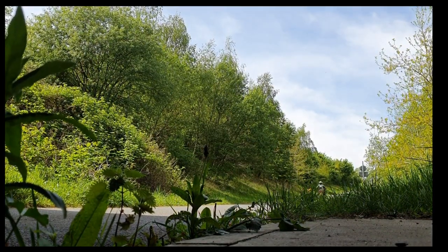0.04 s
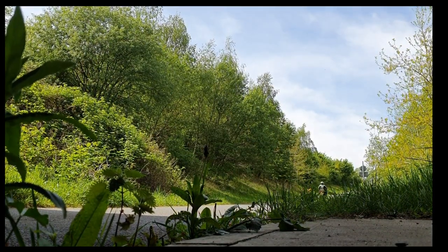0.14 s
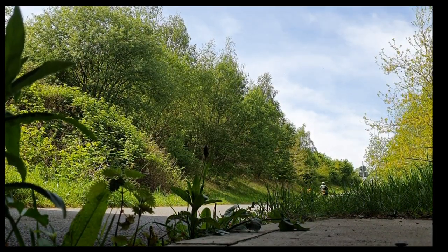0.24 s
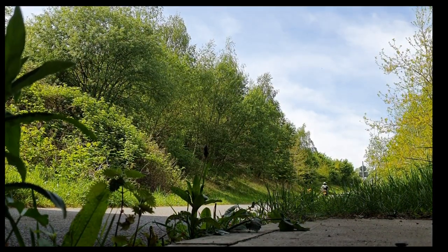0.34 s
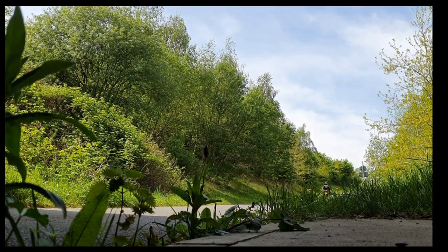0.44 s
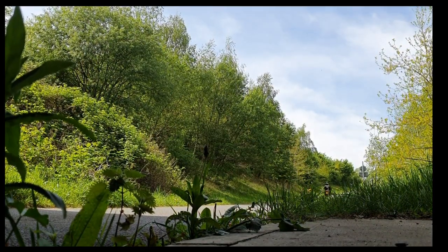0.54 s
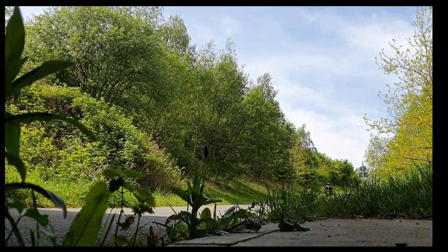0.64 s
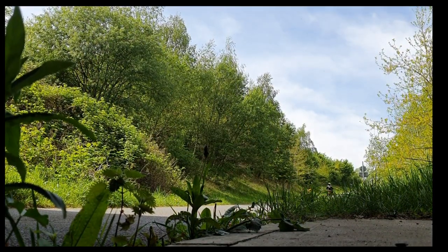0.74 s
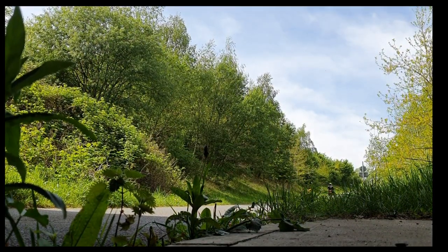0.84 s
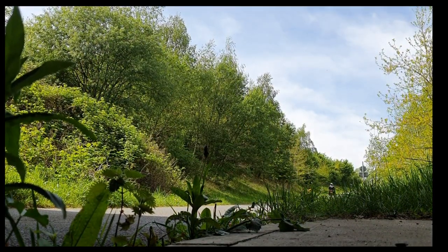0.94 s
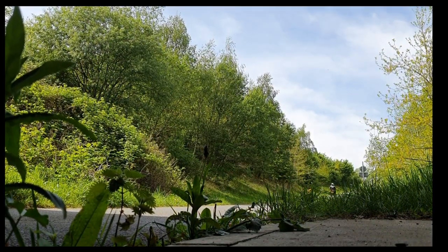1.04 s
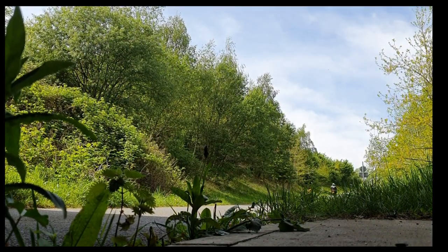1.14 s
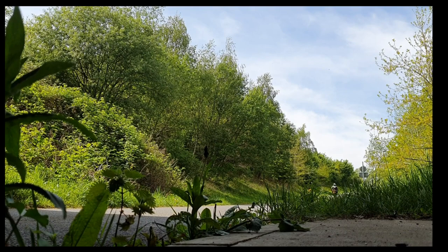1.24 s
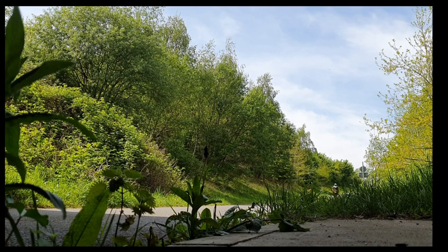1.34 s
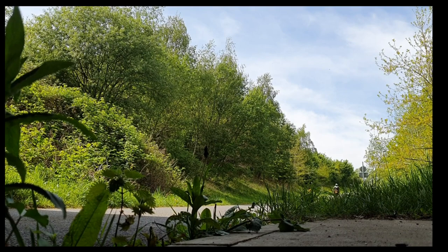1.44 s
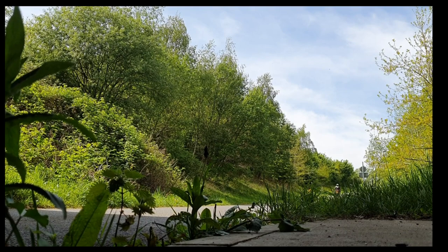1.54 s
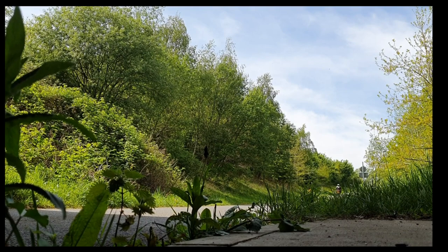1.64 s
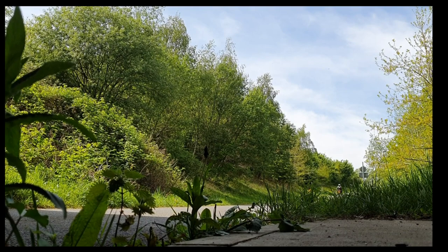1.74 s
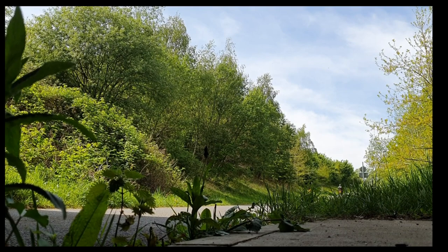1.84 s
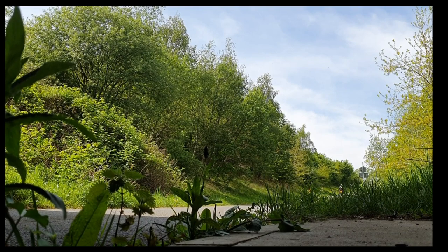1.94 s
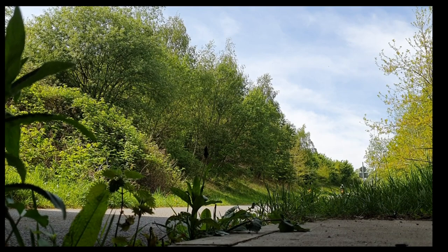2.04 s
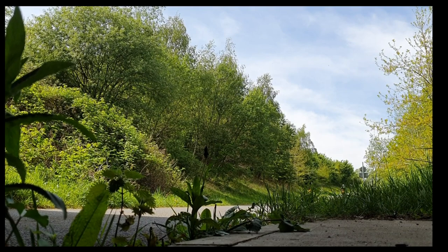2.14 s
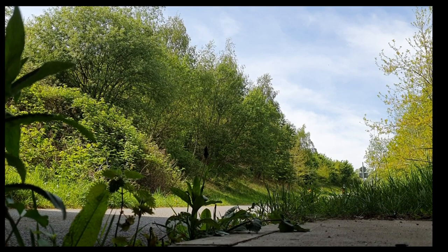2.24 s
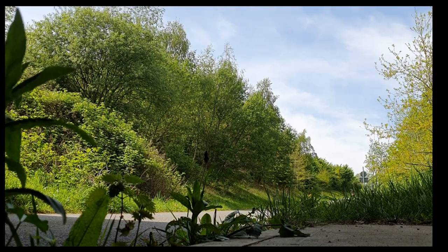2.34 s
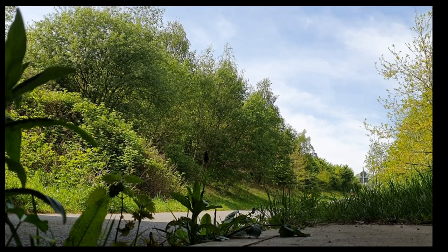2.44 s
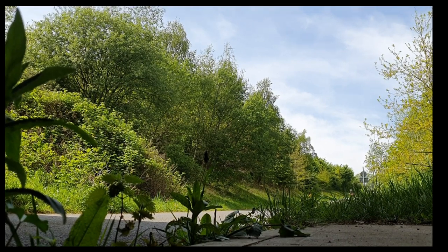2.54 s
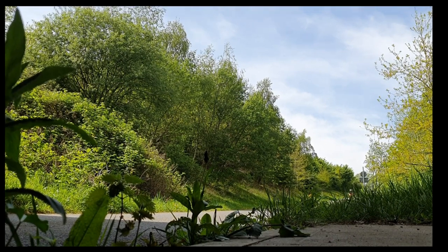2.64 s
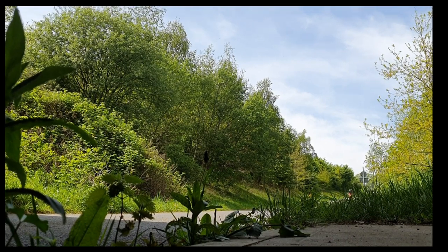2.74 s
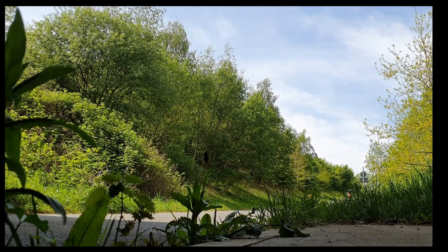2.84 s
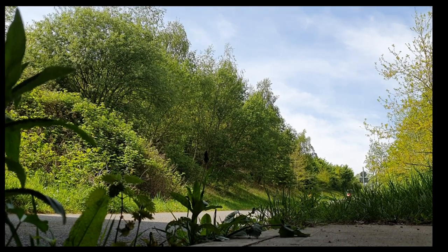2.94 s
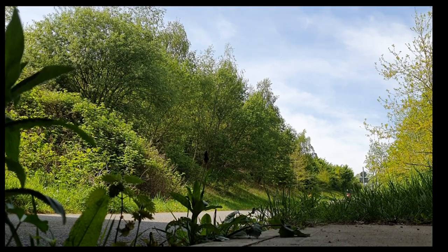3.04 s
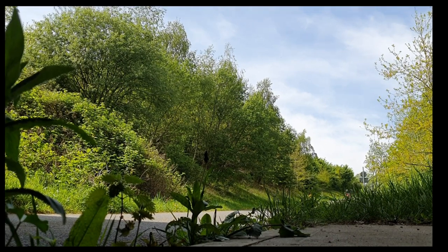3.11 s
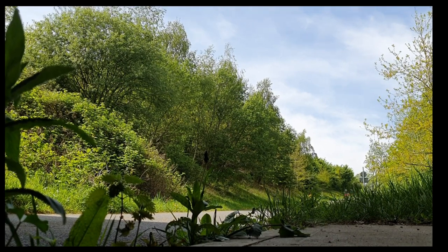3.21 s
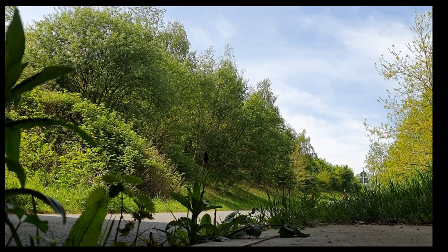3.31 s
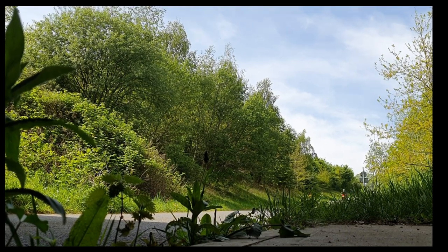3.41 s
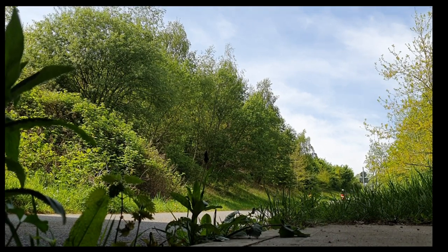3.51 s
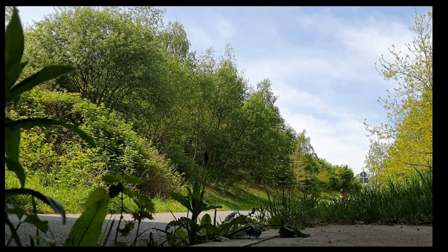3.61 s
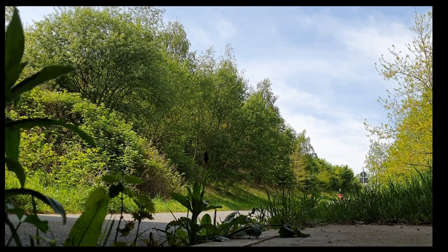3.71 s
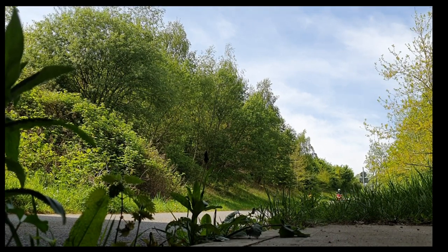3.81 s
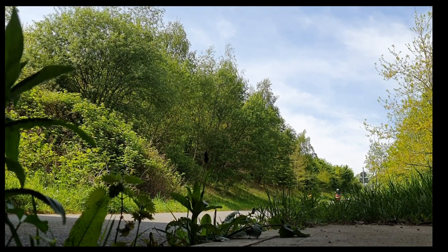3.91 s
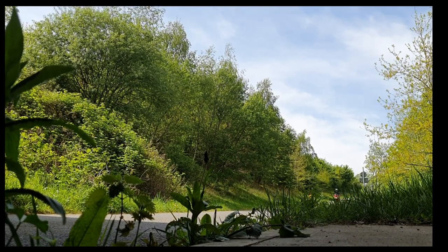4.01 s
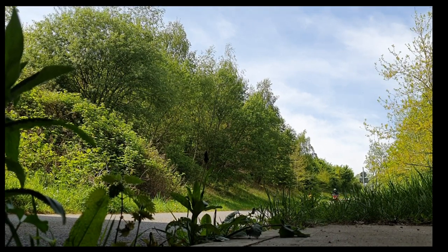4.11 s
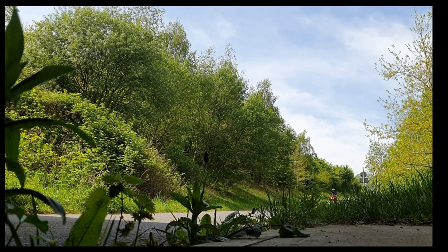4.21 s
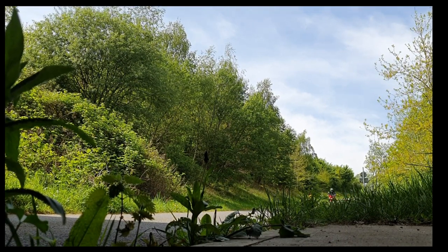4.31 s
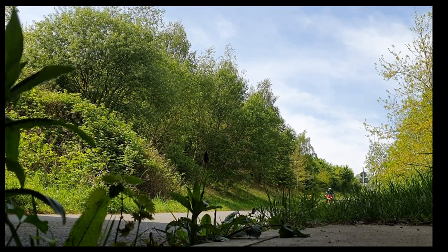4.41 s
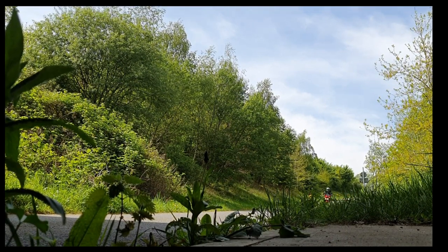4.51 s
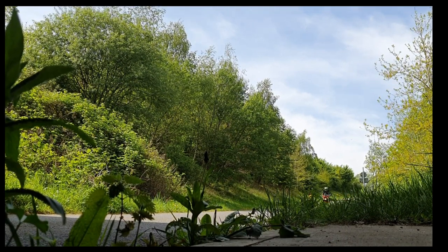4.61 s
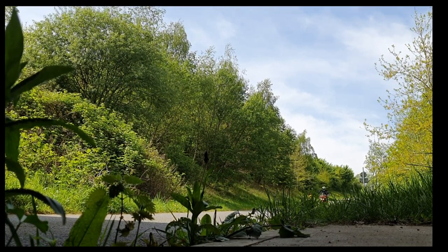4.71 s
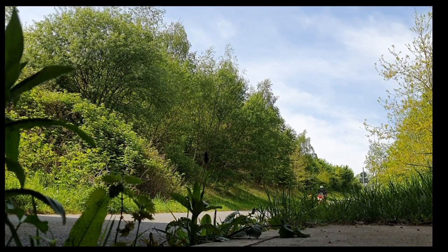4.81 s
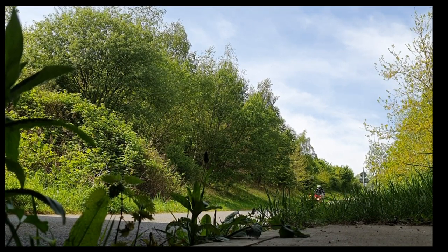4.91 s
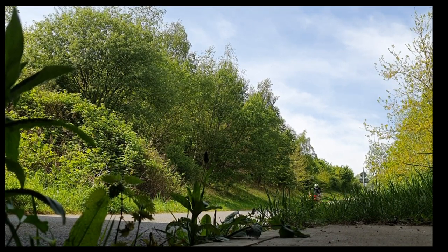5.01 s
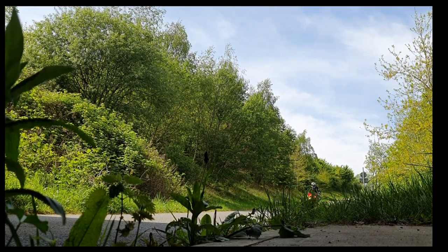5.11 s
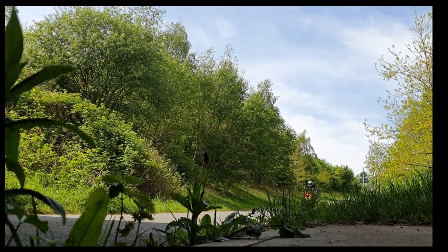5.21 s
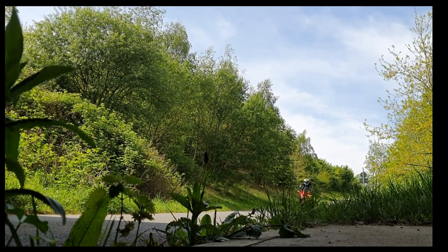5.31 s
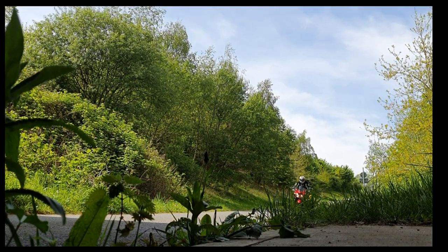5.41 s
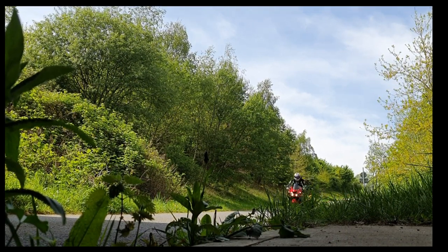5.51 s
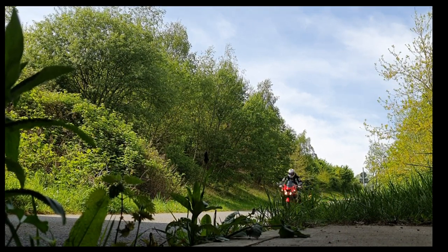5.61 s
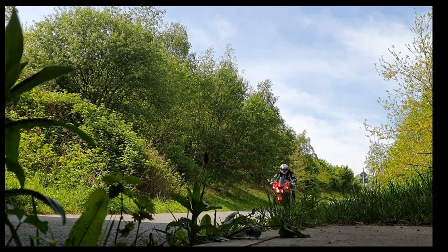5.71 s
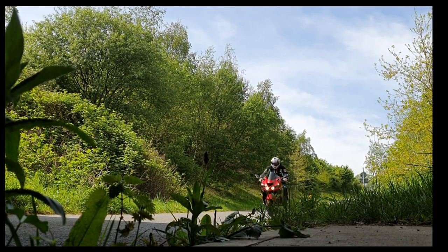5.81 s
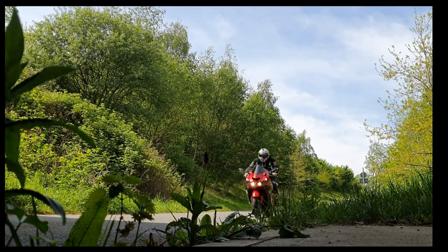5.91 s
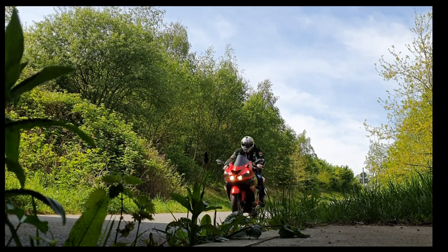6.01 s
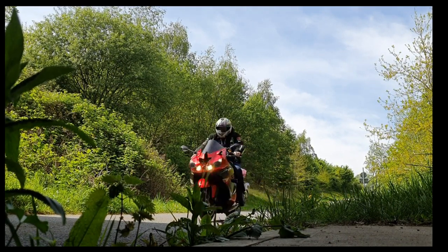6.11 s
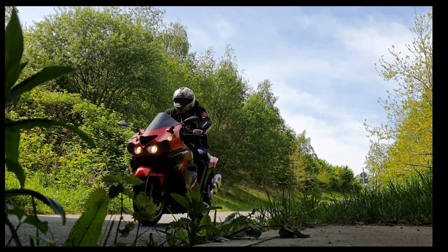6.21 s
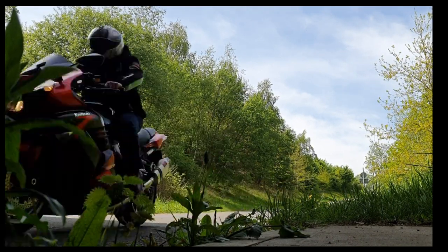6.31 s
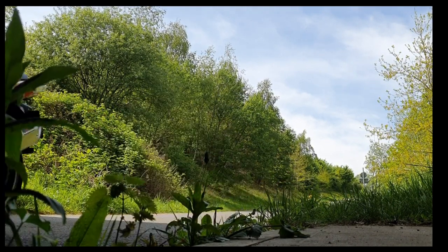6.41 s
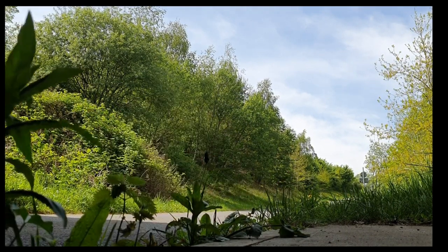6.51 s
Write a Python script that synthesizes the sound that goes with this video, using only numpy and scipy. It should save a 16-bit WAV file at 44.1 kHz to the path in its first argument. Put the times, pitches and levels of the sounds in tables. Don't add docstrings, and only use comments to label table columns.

```python
import sys
import numpy as np
from scipy import signal
from scipy.io import wavfile
from scipy.ndimage import uniform_filter1d

SR = 44100
rng = np.random.default_rng(int(sys.argv[2]) if len(sys.argv) > 2 else 0)


def store_pcm(level_fs):
    pcm = np.round(np.clip(level_fs, -1, 1) * 32767).astype(np.int16)
    wavfile.write(sys.argv[1], SR, np.atleast_2d(pcm).T)


def volts_from_decibels(level):
    exponent = np.asarray(level, float) / 20
    return 10 ** exponent


N = 288836
T = np.arange(N) / SR
CUT_S, ABEAM_S = 2.2695, 6.4
# (time [s], level [dB])
DRONE_FADE = [(0, -26), (.4, -24), (1.05, -31), (1.65, -42), (2.25, -34)]


def evened(x):
    return x / np.sqrt(np.mean(abs(x) ** 2) + 1e-20)


def read(points, hz):
    f, value = np.transpose(points)
    return np.interp(np.log(hz + 1), np.log(f + 1), value)


def columns(rows, t):
    s, *values = np.transpose(rows)
    return [np.interp(t, s, v) for v in values]


def drift(rate_hz):
    size = max(int(SR / 64 / rate_hz), 1)
    slow = uniform_filter1d(uniform_filter1d(rng.standard_normal(N // 64 + 2), size), size)
    return np.interp(np.arange(N), np.arange(len(slow)) * 64, evened(slow))


def noise(far, near, band_hz, lag_samples):
    # (frequency [Hz], correlation [0-1])
    likeness = [(30, .99), (300, .97), (600, .85), (1200, .6), (2000, .4), (4000, .35), (9000, .25),
                (16000, .3)]
    # (frequency [Hz], level [dB])
    lean_db = [(60, -1), (500, -1.6), (4000, -2.3), (9000, 2), (15000, 2.8)]
    patchy_db = 1.2
    frames, hz = N // 256 + 5, np.fft.rfftfreq(1024, 1 / SR)
    a, b, c, d, patches = rng.standard_normal((frames, 513, 5)).T
    patches = evened(uniform_filter1d(uniform_filter1d(patches, 8, 0), 12, 1))
    frame_s = np.arange(frames) * 256 / SR
    closeness = np.interp(frame_s, [CUT_S, 2.3, 3.3, 5, 6, 6.35], [0, .25, .05, .5, .8, 1])
    shape = volts_from_decibels(np.outer(read(far, hz), 1 - closeness) + np.outer(read(near, hz), closeness))
    inside = (hz >= band_hz[0]) & (hz <= band_hz[1])
    shape /= np.sqrt((shape[inside] ** 2).sum(0))
    same = np.clip(read(likeness, hz), 0, 1)[:, None]
    right = a + 1j * b
    left = same * right + np.sqrt(1 - same ** 2) * (c + 1j * d)
    late = np.exp(-2j * np.pi * hz * lag_samples / SR)[:, None]
    lean = volts_from_decibels(read(lean_db, hz) / 2)[:, None]
    z = np.array([lean * late * left, right / lean]) * shape * volts_from_decibels(patchy_db * patches)
    return np.sqrt(1.5) * signal.istft(z, nperseg=1024, noverlap=768)[1][:, :N]


def birds():
    # (start [s], from [Hz], to [Hz], level [dB])
    chirps = [(.055, 3950, 3850, -63), (.33, 5600, 4900, -65), (.655, 5400, 3800, -61),
              (.942, 5700, 4380, -62), (1.245, 5800, 4950, -60), (1.625, 4100, 3720, -63),
              (1.905, 4500, 4450, -61), (2.235, 5900, 5000, -61)]
    # (start [s], length [s], from [Hz], to [Hz], level [dB])
    song = [(2.29, .09, 4670, 4520, -51), (2.374, .03, 4570, 4200, -50), (2.665, .045, 7670, 5930, -46),
            (2.669, .012, 5530, 7000, -56), (2.736, .011, 4040, 5670, -52), (2.742, .03, 5680, 4750, -50),
            (2.835, .022, 4350, 3000, -44), (2.859, .018, 3100, 2350, -52), (2.88, .05, 2510, 3620, -42.5),
            (2.971, .075, 6310, 3665, -42.5), (3.038, 0.089, 3580, 4190, -43),
            (3.17, .065, 3900, 2340, -50), (3.233, .05, 2290, 2890, -52), (3.303, 0.039, 2750, 2610, -54),
            (3.446, .055, 3730, 2390, -50.5), (3.505, .045, 3400, 3810, -50.5),
            (3.58, 0.06, 2880, 3210, -48), (3.631, 0.03, 3110, 2320, -52.5),
            (3.666, 0.056, 2330, 2530, -54)]
    chirp_s, chirp_glide, song_glide = .05, 5.5, 2.7
    swell_at, swell_db = .55, -16
    dry, waver = np.zeros((2, N)), .6 * drift(200)
    notes = [(s, chirp_s, a, b, db, chirp_glide) for s, a, b, db in chirps]
    notes += [(*row, song_glide) for row in song]
    for s, length_s, from_hz, to_hz, top_db, glide in notes:
        span = slice(round(s * SR), round((s + length_s) * SR))
        u = (T[span] - s) / length_s
        hz = to_hz + (from_hz - to_hz) * np.exp(-glide * u)
        level = volts_from_decibels(top_db + swell_db * (u - swell_at) ** 2)
        whistle = np.sin(2 * np.pi * np.cumsum(hz) / SR + waver[span])
        note = np.sqrt(2) * level * whistle * signal.windows.tukey(len(hz), .12)
        dry[:, span] += note * volts_from_decibels(np.array([[.5], [2.5]]))
    dry *= volts_from_decibels(3.2 * drift(130))
    dry[0] = np.roll(dry[0], 2)
    t = T[:SR // 2]
    trees = rng.standard_normal((2, len(t))) * volts_from_decibels(-60 * t / .55) * np.clip(t / .01, 0, 1)
    trees /= np.linalg.norm(trees[0])
    ground = volts_from_decibels(-10) * np.roll(dry[::-1], 400, axis=1)
    return dry + ground + volts_from_decibels(-7) * signal.fftconvolve(dry, trees, axes=1)[:, :N]


def drone():
    note_db = columns(DRONE_FADE, T)[0]
    octave_db = -33 + 1.6 * (note_db + 22)
    angle = 2 * np.pi * 63.55 * T + .3 * drift(8)
    hum = volts_from_decibels(note_db + 0.4 * drift(7.6)) * np.sin(angle) + volts_from_decibels(octave_db) * np.sin(2 * angle)
    hum = np.sqrt(2) * hum * np.clip((CUT_S - T) / .004, 0, 1)
    return np.array([volts_from_decibels(2.8) * np.roll(hum, 20), hum])


def wind():
    # (frequency [Hz], level [dB/Hz])
    gust = [(20, -12.5), (32, -6.5), (45, 17), (70, 1), (110, -5.5), (200, -5), (400, -23), (900, -58)]
    lull_s, blast_s, blast_rise_s = 0.96, 6.33, 0.022
    early_db = -32.5 + .75 * (columns(DRONE_FADE, T)[0] + 24)
    late_db = -55.5 + 13.5 * np.exp(-(T - CUT_S) / lull_s)
    late_db += 25 / (1 + np.exp(-(T - blast_s) / blast_rise_s))
    level = volts_from_decibels(np.where(T < CUT_S, early_db, late_db))
    return level * volts_from_decibels(2 * drift(14)) * noise(gust, gust, (25, 55), 0)


def blast():
    # (time [s], thump [dB], length [s], choked share of engine tone [0-1])
    pops = [
        (3.48, -30, .08, 0),
        (6.368, -18, .007, .75),
        (6.385, -21, .012, 0),
        (6.455, -15, .011, .9),
        (6.51, -22, .015, .1),
    ]
    raw = signal.lfilter(*signal.butter(1, [50, 240], "band", fs=SR), rng.standard_normal(N))
    raw = evened(signal.lfilter(*signal.butter(2, 700, fs=SR), raw))
    thumps, gain = np.zeros(N), np.ones(N)
    for s, thump_db, length_s, choke in pops:
        bump = np.exp(-((T - s) / length_s) ** 2)
        thumps += volts_from_decibels(thump_db) * bump * raw
        gain -= choke * bump
    return thumps, gain


def chain():
    # (frequency [Hz], level [dB/Hz])
    rub = [(1530, -38), (2600, -8.5), (3060, -10.5), (3610, 3), (4220, -4), (5100, -13), (7500, -18),
           (9750, -46), (16500, -120)]
    level_db = -34 - 8.7 * ((T - ABEAM_S + .03) / .23) ** 2
    return volts_from_decibels(level_db) * noise(rub, rub, (3200, 6500), 6)


def treble(near):
    # (frequency [Hz], level [dB/Hz])
    far_treble = [(4410, -31), (7500, -0.5), (9470, -2), (12000, -20.5), (13000, -16.5), (15600, -31)]
    # (frequency [Hz], level [dB/Hz])
    near_treble = [(4410, -32), (7500, -7.5), (8640, -2), (11200, -2), (15100, -10.5), (15600, -8)]
    level_db = -82.5 + 23 * np.tanh(near / 0.44)
    level_db += 36.5 * np.maximum(T - 6.013, 0)
    return volts_from_decibels(level_db) * noise(far_treble, near_treble, (8000, 15000), 6)


def hiss(turns, near):
    # (frequency [Hz], level [dB/Hz])
    far_hiss = [(760, -27), (1300, -1), (1810, -1), (2110, -4), (2760, -5.5), (3040, -1.5), (3430, -7),
                (3940, -4), (5110, -12.5), (6890, -22), (9000, -37), (11700, -53.5), (19800, -120)]
    # (frequency [Hz], level [dB/Hz])
    near_hiss = [(760, -33.5), (1300, -4), (1920, -0.5), (2290, -3.5), (2780, -5), (3250, -12), (3750, -5),
                 (4380, -9.5), (5400, -22.5), (9000, -25), (11700, -54.5), (19800, -120)]
    puff = 1 + .15 * np.cos(2 * np.pi * turns)
    return volts_from_decibels(-56 + 19.5 * near) * puff * noise(far_hiss, near_hiss, (1400, 2200), 6)


def roar(hz, turns, near, past):
    # (frequency [Hz], level [dB/Hz])
    far_roar = [(40, -4.5), (70, 9.5), (130, 25.5), (250, 14), (450, 12.5), (700, 3), (1200, -3),
                (2000, -53), (6000, -65.5)]
    # (frequency [Hz], level [dB/Hz])
    near_roar = [(40, -27), (70, -12.5), (130, 8), (220, 8.5), (450, 5), (700, 7), (1200, 2.5),
                 (2000, -51.5), (6000, -68)]
    eased = np.clip((T - 2.945) / 0.37, 0, 1)
    pull_db = -49.5 + 7.5 * np.log2(np.maximum(hz / 98, 1))
    off_db = -48.5 + 15 * near - 4.5 * past
    level_db = (1 - eased) * pull_db + eased * off_db
    puff = 1 + .3 * np.cos(2 * np.pi * turns)
    return volts_from_decibels(level_db) * puff * noise(far_roar, near_roar, (650, 1300), 12)


def motion():
    # (time [s], firing rate [Hz])
    speed = [(0, 87.2), (.52, 91.6), (.83, 95), (1.34, 102.1), (1.96, 110.6), (2.268, 113.3),
             (2.271, 127.7), (2.9, 161.8), (3.21, 175.6), (3.31, 178.7), (3.42, 172.2), (3.52, 169.9),
             (3.65, 173), (4.04, 167.8), (5.09, 156), (6.13, 142.1), (6.34, 138.4), (6.55, 131.6)]
    # (time [s], nearness [0-1])
    approach = [(3.4, 0), (4, 0.1), (4.5, 0.16), (5, .38), (5.5, 0.55), (5.75, 0.76), (6, 0.76),
                (6.2, 0.97)]
    return columns(speed, T)[0], columns(approach, T)[0], np.clip((T - 6.38) / 0.11, 0, 1)


def orders(hz, near, past):
    # (time [s], level [dB])
    pull_first = [(0, -25), (.21, -24.6), (.45, -17.5), (.93, -15.2), (1.34, -17.8), (1.55, -27),
                  (1.68, -24.5), (1.86, -32), (2.1, -20), (2.28, -18), (2.37, -28.5), (2.58, -28),
                  (2.69, -21.5), (3.08, -16.7), (3.23, -20.7), (3.45, -20)]
    # (start [dB], change [dB/s])
    pull_second = [
        (-22.5, -3.5),
        (-31, 0.5),
    ]
    # (frequency [Hz], level [dB])
    pipe = [(262, -25), (340, -35), (410, -28), (450, -32.5), (505, -37.5), (590, -32.5), (660, -39),
            (710, -54)]
    # (far off [dB], rise on approach [dB], change once past [dB])
    overrun = [
        (-16.5, 7, -0.5),
        (-43, 12.5, 7),
        (-45, 11, 3.5),
        (-60.5, 15, -2.1),
    ]
    (start_a, slope_a), (start_b, slope_b) = pull_second
    second_db = np.where(T < CUT_S, start_a + slope_a * T, start_b + slope_b * (T - CUT_S))
    pull = [columns(pull_first, T)[0], second_db, read(pipe, 3 * hz), read(pipe, 4 * hz)]
    off = [far + rise * near + change * past for far, rise, change in overrun]
    off[0] = off[0] + 1.5 * np.cos(2 * np.pi * 2.6 * (T - 3.95)) + .5 * drift(7)
    ring_hz, ring_width_hz, ring_db = 425.2, 3.4, 6
    off[2] = off[2] + ring_db * np.exp(-((3 * hz - ring_hz) / ring_width_hz) ** 2)
    shut = [np.clip((T - s) / .08, 0, 1) for s in (3.44, 3.33, 3.33, 3.33)]
    return [(1 - u) * a + u * b for u, a, b in zip(shut, pull, off)]


def engine(hz, turns, near, past):
    # (order [multiple], far off [dB], under load [dB], on the overrun [dB])
    upper = [(.5, -20, -6, -11), (1.5, -20, -11, -1), (2.5, -18, -11, -7), (3.5, -26, -14, -14),
             (5, -9, -14, -4.5), (6, -18, -18, -14), (7, -32, -30, -18)]
    # (time [s], left over right [dB])
    bearing = [(0, -3.7), (.6, -1), (2.8, -2), (3.3, -3.5), (4.1, -3.5), (4.6, -1.5), (6.5, -0.9)]
    orders_db = orders(hz, near, past)
    shut_s = 3.4
    stages_s = [CUT_S - .002, CUT_S + .002, shut_s, shut_s + .1]
    calm_db = uniform_filter1d(np.maximum(orders_db[2], orders_db[3]), SR // 4)
    levels = [(k + 1, db) for k, db in enumerate(orders_db)]
    for k, far, load, off in upper:
        levels.append((k, calm_db + np.interp(T, stages_s, [far, load, load, off])))
    flip = np.interp(T, stages_s[:2], [np.pi, 0])
    lag_turns = np.array([[11.], [0]]) * hz / SR
    out = np.zeros((2, N))
    for k, db in levels:
        uneven = .06 * k ** .5 + .13 * (k % 1 > 0)
        shimmer = 1 + uneven * (drift(25) + 1j * drift(25))
        angle = 2 * np.pi * k * (turns - lag_turns) + (k - 1) * flip - 0.11 * k * k
        out += np.sqrt(2) * volts_from_decibels(db) * (shimmer * np.exp(1j * angle)).real
    swell_db = 2.7 * np.exp(-((T - ABEAM_S) / 0.12) ** 2)
    return out * volts_from_decibels(np.outer([.5, -.5], columns(bearing, T)[0])) * volts_from_decibels(swell_db)


def scene():
    hz, near, past = motion()
    turns = np.cumsum(hz) / SR
    thumps, gain = blast()
    mix = birds() + drone() + wind() + thumps
    mix += chain() + treble(near) + hiss(turns, near) + roar(hz, turns, near, past)
    return mix + gain * engine(hz, turns, near, past)


def band_limit(x):
    return signal.sosfilt(signal.butter(12, 15800, fs=SR, output="sos"), x)


def record(dry):
    dry = signal.lfilter(*signal.butter(2, 48, "high", fs=SR), dry)
    since_s = T - CUT_S
    jump = -np.sign(since_s) * np.exp(-abs(since_s) / 0.0037)
    return band_limit(dry + volts_from_decibels(-19.5) * jump)


dry = scene()
out = record(dry)
store_pcm(out)
```